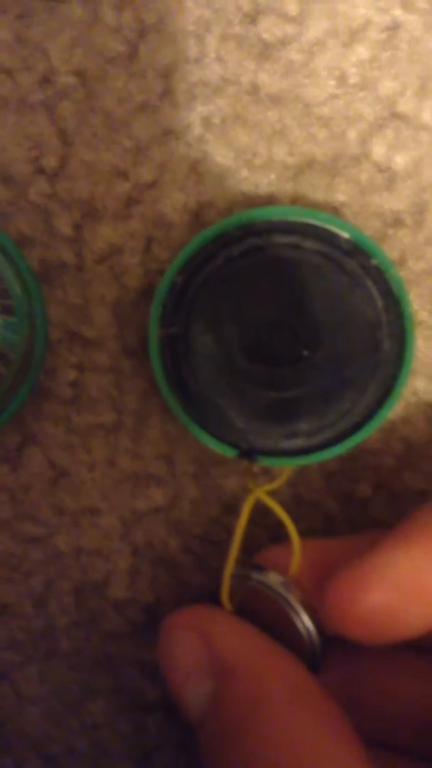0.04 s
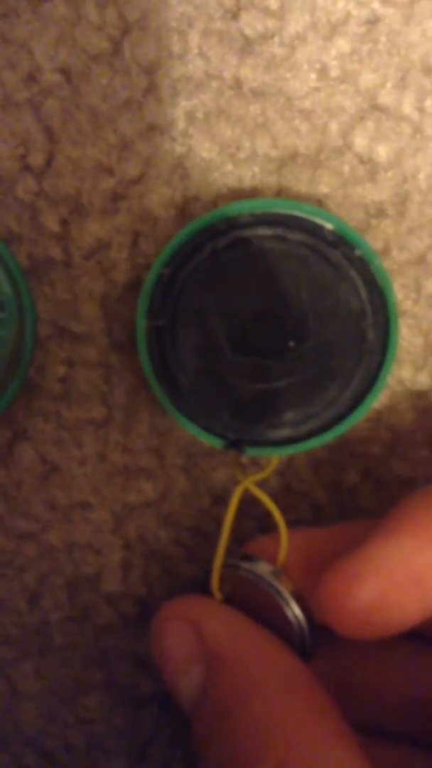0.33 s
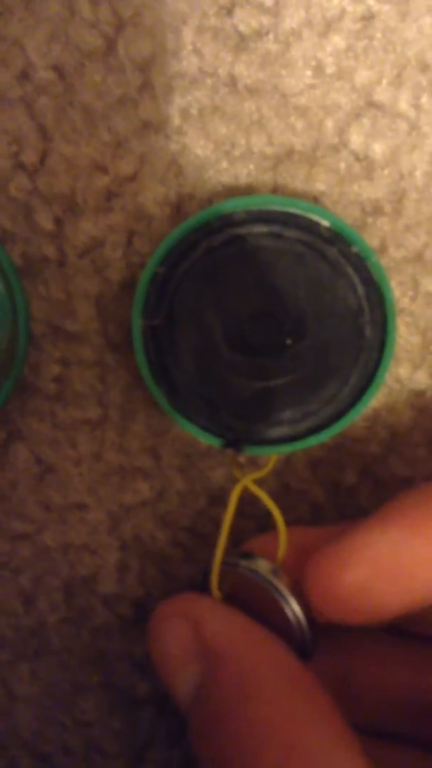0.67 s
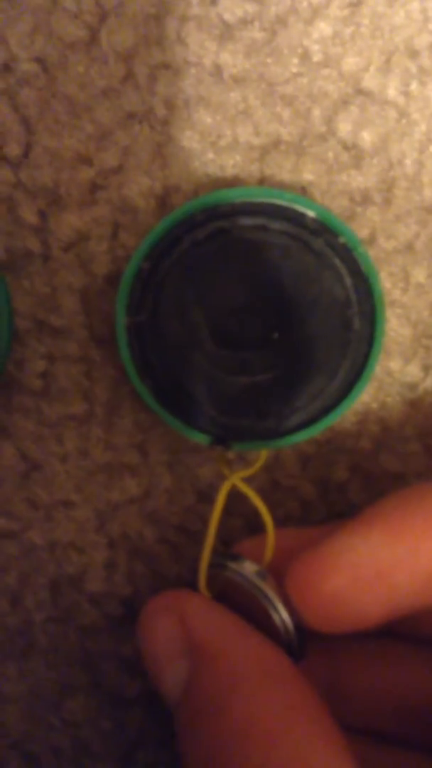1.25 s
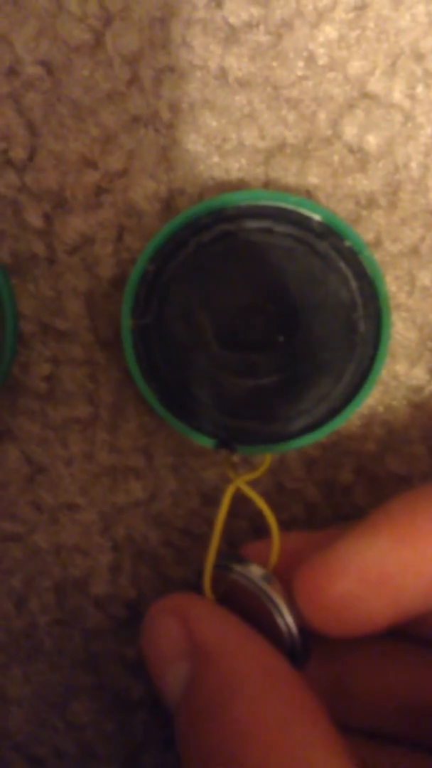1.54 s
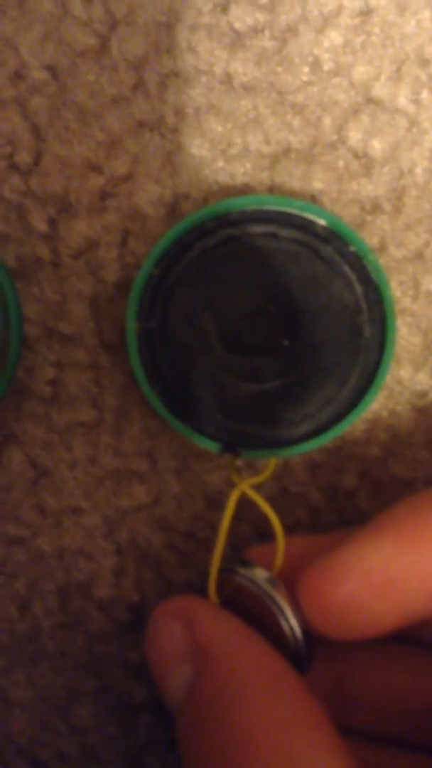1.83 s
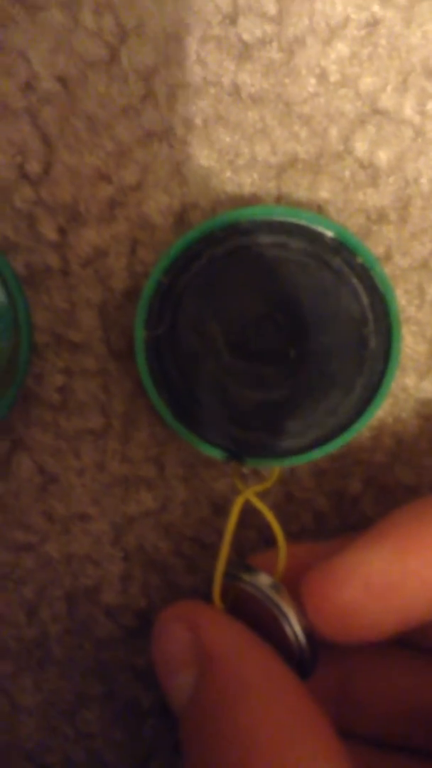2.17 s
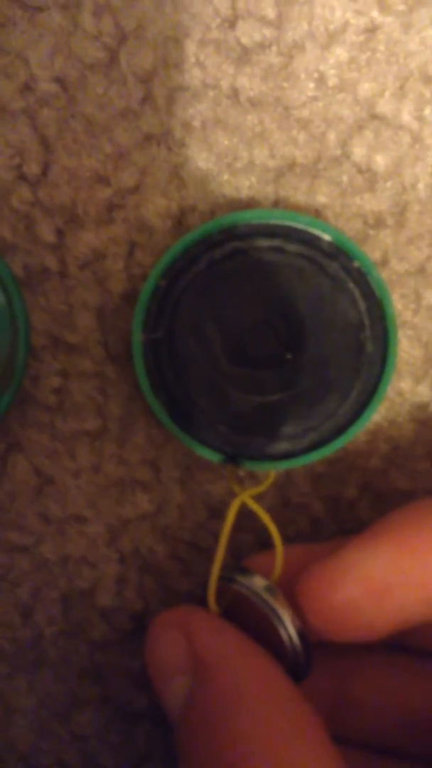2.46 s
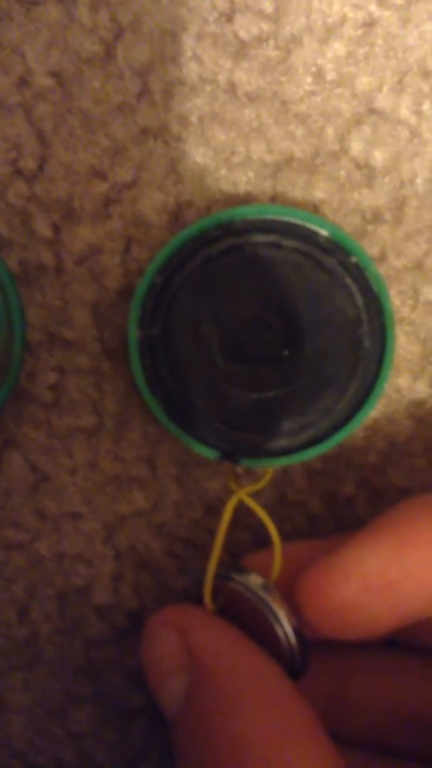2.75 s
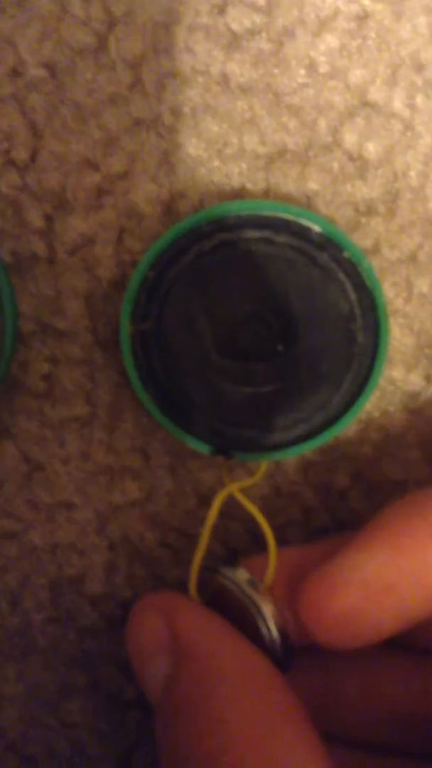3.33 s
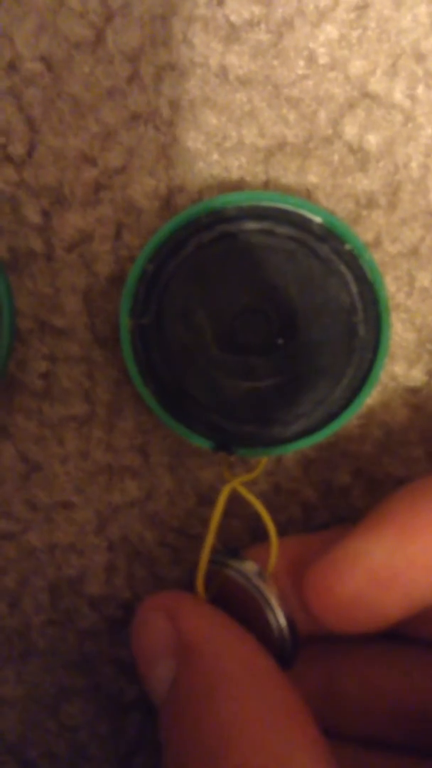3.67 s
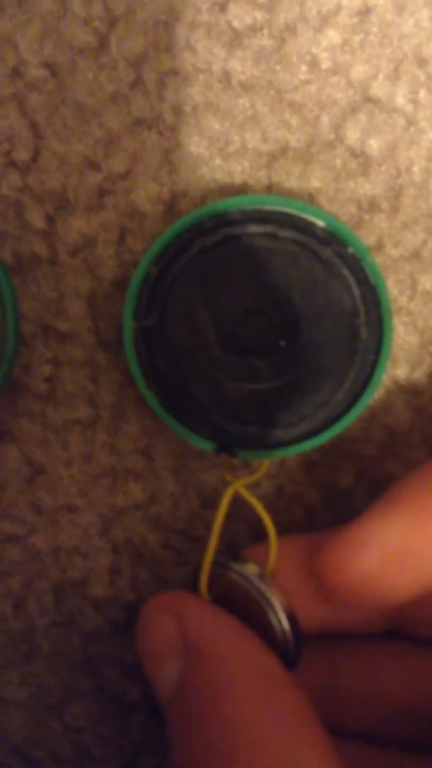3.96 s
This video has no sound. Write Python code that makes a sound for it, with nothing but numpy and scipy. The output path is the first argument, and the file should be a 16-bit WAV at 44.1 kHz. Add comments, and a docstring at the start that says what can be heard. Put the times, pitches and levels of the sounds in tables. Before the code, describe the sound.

A small speaker crackles harshly as its bare wires are rubbed on a button cell. Uneven fizzing bursts alternate with brief gaps and sharp snaps, close to the microphone in a quiet, dead room with faint hiss.

```python
"""A small loudspeaker crackles as its bare leads are rubbed on a button cell, close to the microphone.
The uneven contact chops the current into dense impulses; making or breaking it outright gives a sharp
snap. Both excite the resonances of the cone. The wire also scratches faintly on the metal.
The speaker lies on carpet in a small, dead room with a low hum and hiss."""
import sys
import numpy as np
from scipy import signal
from scipy.fft import rfft, irfft, next_fast_len
from scipy.io import wavfile
from scipy.ndimage import map_coordinates

SR = 44100
rng = np.random.default_rng(int(sys.argv[2]) if len(sys.argv) > 2 else 0)


def to_wav(s):
    """Save 16-bit WAV."""
    ch = np.atleast_2d(s).T  # columns
    pcm = np.round(np.clip(ch, -1, 1) * 32767)  # PCM
    wavfile.write(sys.argv[1], SR, pcm.astype(np.int16))


N = 176400

MIDDLING_DB, BREAKS_PER_S = -46, 5000  # level and rate of brief breaks in a middling rub


def crackle(rub_db):
    """Shot noise drives the cone: sparse, long breaks sputter in light rubs, brief ones fizz when firm."""
    # spectral weighting of a brief and of a long break (frequency [Hz], gain [dB])
    brief_tilt = [(950, -5.5), (2000, -0.5), (9500, 2.5)]
    long_tilt = [(950, 4), (1600, 0.5), (5000, 1.5), (7500, -5.5)]
    long_share = .65 / (1 + amp(rub_db) ** 2)  # fraction of the power
    size = amp(rub_db + MIDDLING_DB - 1)
    brief_breaks = ticks(BREAKS_PER_S * np.exp(0.02 * rub_db)) * size * np.sqrt(1 - long_share)
    long_breaks = ticks(per_s=550) * size * np.sqrt(long_share)
    fizz = signal.fftconvolve(brief_breaks, cone_click(brief_tilt))
    sputter = signal.fftconvolve(long_breaks, cone_click(long_tilt))
    return (fizz + sputter)[:N]


def rubbing():
    """Stick-slip friction: rub strength in dB over a middling rub, steadier as the rub grows firmer."""
    # contact envelopes: one per rub, and a long, faint one for the resting wire (time [s], level [dB])
    rubs = [
        [(0, -44.5), (.05, -42), (.066, -61), (.085, -61), (.097, -43)],
        [(.31, -77), (3.78, -76.5)],
        [(.324, -52), (.365, -47), (.386, -52), (.439, -51), (.48, -85.5)],
        [(.505, -83), (.525, -60.5), (.55, -96)],
        [(.593, -53.5), (.645, -62), (.65, -49.5), (.69, -47.5), (.7, -37.5), (.726, -37.5)],
        [(.819, -37), (.9, -42.5), (.974, -68.5), (.981, -48), (.989, -70), (1.001, -49.5), (1.03, -49.5),
         (1.046, -60.5), (1.054, -47.5), (1.095, -42.5), (1.192, -54.5)],
        [(1.201, -41.5), (1.257, -44), (1.295, -68)],
        [(1.309, -46.5), (1.346, -50), (1.358, -66), (1.382, -54), (1.388, -39.5), (1.439, -39.5), (1.455, -54),
         (1.504, -44), (1.598, -53), (1.61, -46.5), (1.626, -54.5), (1.639, -43.5), (1.675, -60), (1.692, -46),
         (1.72, -64.5)],
        [(1.76, -58), (1.887, -51), (1.911, -60), (1.914, -49.5), (1.921, -54), (1.928, -83), (1.94, -55),
         (1.979, -35)],
        [(2.105, -53), (2.114, -44), (2.121, -83), (2.145, -63), (2.15, -51.5), (2.174, -60.5), (2.245, -54.5),
         (2.272, -79)],
        [(2.301, -68), (2.309, -59.5), (2.325, -82)],
        [(2.347, -53.5), (2.453, -38.5)],
        [(2.571, -41), (2.613, -42), (2.621, -52), (2.638, -46), (2.667, -78)],
        [(2.714, -59), (2.776, -53), (2.783, -48), (2.815, -53.5), (2.89, -43.5), (2.968, -46), (2.98, -51.5),
         (3.024, -56), (3.06, -60.5), (3.093, -41), (3.173, -41.5), (3.201, -60.5), (3.246, -57), (3.27, -73)],
        [(3.311, -38.5), (3.376, -41.5), (3.41, -49.5), (3.462, -51), (3.472, -42.5), (3.486, -60.5),
         (3.495, -43.5), (3.51, -63), (3.561, -59), (3.566, -49), (3.6, -50.5), (3.621, -41), (3.69, -36)],
        [(3.82, -64), (3.825, -81)],
    ]
    t = np.arange(N) / SR
    envelopes = [np.interp(t, *np.transpose(rub), left=-120, right=-120) for rub in rubs]
    rub_db = np.max(envelopes, axis=0) - MIDDLING_DB
    unsteadiness = np.clip(1 - 0.1 * rub_db, .3, 1.25)
    flutter = 2.5 * np.clip(wobble(knots_per_s=190), -2, 1)
    grit = 3 * np.clip(wobble(knots_per_s=700), -2, 1)
    return rub_db + unsteadiness * flutter + np.sqrt(unsteadiness) * grit


def ticks(per_s, spread_db=3):
    """A random point process: impulses of either sign and uneven size, with mean power 1."""
    chance = np.clip(per_s / SR, 1e-3, 1)
    sizes = unit(amp(spread_db * np.clip(rng.standard_normal(N), -2, 2)))
    signs = rng.choice([-1, 1], N)
    return (rng.random(N) < chance) * sizes * signs / np.sqrt(chance)


def cone_click(tilt, resonance_hz=922, width_hz=76, size=4096):
    """Damped resonance: the cone's response to one jump of current, scaled to energy 1."""
    # colour of the cone's break-up modes (frequency [Hz], gain [dB])
    break_up = [(520,-37.5),(700,-30),(900,-20.5),(1300,-18.5),(1750,-17),(2000,-14),(2600,-15),(3150,-8),(3400,-11.5),(4000,-4.5),(4650,-4.5),(5250,1.5),(5900,-5.5),(6450,1.5),(7250,-9.5),(7550,-16),(8100,-10),(8880,-17),(9550,-9.5),(11400,-24),(12300,-47),(14300,-27),(15500,-41)]
    hz = np.fft.rfftfreq(size, 1 / SR)
    resonance = np.abs(hz ** 2 / (resonance_hz ** 2 - hz ** 2 + 1j * hz * width_hz))
    magnitude = resonance * along(break_up, hz) * along(tilt, hz)
    # folding the cepstrum gives a causal, minimum-phase click
    cepstrum = irfft(np.log(magnitude + 1e-4))
    cepstrum[1:size // 2] *= 2
    cepstrum[size // 2 + 1:] = 0
    click = irfft(np.exp(rfft(cepstrum)))
    return click / np.linalg.norm(click)


def snaps():
    """Step excitation: the full current switches on and off in turn, throwing the cone out and back."""
    # outright makes and breaks of contact (time [s], peak level [dB])
    switchings = [(.0973, -30), (.0978, -22), (.3169, -17.5), (.725, -22), (.8161, -19), (1.4154, -25),
                  (1.9725, -26), (1.9789, -30), (1.9795, -18), (1.98, -22), (1.9815, -25), (2.1005, -18),
                  (2.451, -24), (2.5633, -17), (2.56495, -17), (2.56555, -17), (2.782, -33), (3.2205, -34),
                  (3.3122, -27), (3.3282, -18), (3.5255, -31), (3.6733, -19), (3.6923, -18), (3.6937, -16),
                  (3.6946, -18), (3.6955, -17.5), (3.6967, -19), (3.6987, -16.5), (3.7004, -19),
                  (3.7018, -16), (3.7032, -14), (3.9918, -17.5)]
    # spectral weighting of a snap (frequency [Hz], gain [dB])
    snap_tilt = [(700, 7.4), (950, 2.4), (1500, 4), (6000, 1.8)]
    jumps = np.zeros(N + SR)
    for k, (time_s, peak_db) in enumerate(switchings):
        jumps[round(time_s * SR)] += amp(peak_db) * (-1) ** k
    click = cone_click(snap_tilt)
    return signal.fftconvolve(jumps, click / np.abs(click).max())[:N]


def scratch(rub_db):
    """Friction noise of wire on metal: it grows more slowly than the crackle, so light rubs reveal it."""
    # spectrum of the wire's thin rasp (frequency [Hz], relative level [dB])
    rasp_spectrum = [(900,-33.5),(2400,-8.5),(3100,-2),(4200,1),(5300,1.5),(6600,-9.5),(7600,-22),(15000,-29)]
    rasp = unit(filtered(ticks(BREAKS_PER_S), lambda hz: along(rasp_spectrum, hz)))
    return rasp * amp(-56.5 + 0.73 * rub_db)


def reverberation(x, t60_s, delay_s=0.0022):
    """Diffuse reflections arrive after a short delay and decay exponentially, by 60 dB in t60_s."""
    t = np.arange(SR // 2) / SR
    response = rng.standard_normal(len(t)) * np.exp(-np.log(1000) * t / t60_s) * (t > delay_s)
    return signal.fftconvolve(x, response / np.linalg.norm(response))[:N]


def noise_floor(hum_hz=191):
    """Stationary noise of the room and microphone: broadband hiss and a pure-tone hum."""
    # spectrum of the background noise (frequency [Hz], relative level [dB])
    hiss_spectrum = [(25,-28),(70,-35),(122,-6.5),(200,-0.5),(450,-7.5),(700,-12),(2000,-12),(8000,-16.5),(15500,-20)]
    hiss = unit(filtered(rng.standard_normal(N), lambda hz: along(hiss_spectrum, hz)))
    hum = np.sqrt(2) * np.sin(2 * np.pi * hum_hz * np.arange(N) / SR)
    return amp(-74) * hiss + amp(-94.5) * hum


def amp(db):
    """Decibels to amplitude ratio."""
    return 10 ** (np.asarray(db) / 20)


def unit(x):
    """Normalisation to rms 1."""
    return x / np.sqrt(np.mean(x ** 2) + 1e-20)


def along(points, hz):
    """Amplitude gain, interpolating (frequency [Hz], gain [dB]) points on a log-frequency axis."""
    point_hz, point_db = np.transpose(points)
    return amp(np.interp(np.log(hz + 1), np.log(point_hz + 1), point_db))


def wobble(knots_per_s):
    """Smooth random modulation: a spline through Gaussian knots."""
    return map_coordinates(rng.standard_normal(N // 8), [np.arange(N) * knots_per_s / SR], mode="wrap")


def filtered(x, response):
    """Linear filtering: the spectrum of x times a frequency response."""
    size = next_fast_len(N + SR // 2)
    hz = np.fft.rfftfreq(size, 1 / SR)
    return irfft(rfft(x, size) * response(hz), size)[:N]


def scene():
    """Superposition of the direct sound, near-wall reflections, a faint tail and the noise floor."""
    rub_db = rubbing()
    direct = crackle(rub_db) + scratch(rub_db) + snaps()
    walls = amp(-13.5) * reverberation(direct, t60_s=0.048)
    tail = amp(-29) * reverberation(direct, t60_s=0.22)
    return (direct + walls + tail + noise_floor())[None]


def record(dry):
    """Band limiting by an ideal low-pass filter."""
    return filtered(dry[0], lambda hz: hz < 15700)[None]


dry = scene()
out = record(dry)
to_wav(out)
```